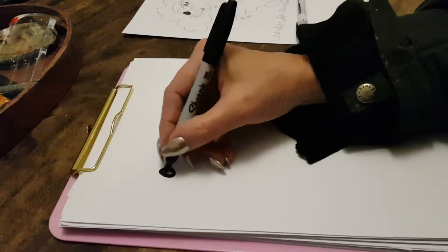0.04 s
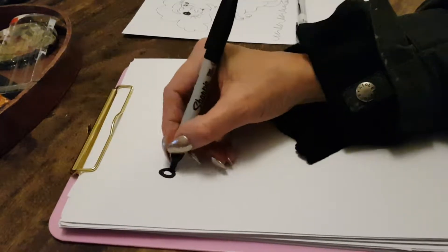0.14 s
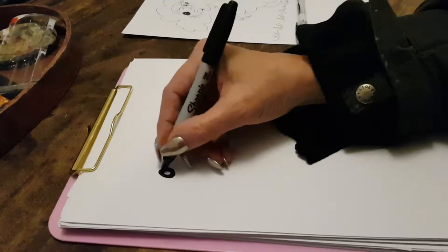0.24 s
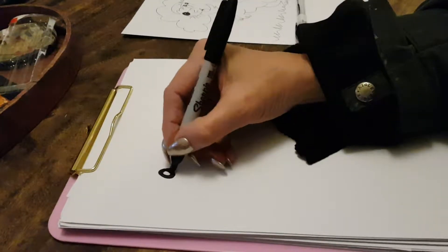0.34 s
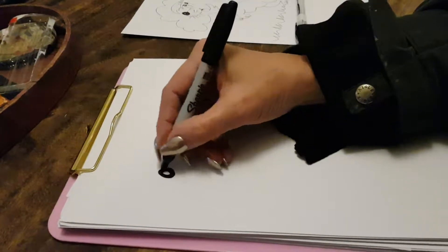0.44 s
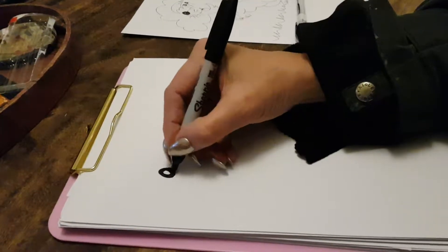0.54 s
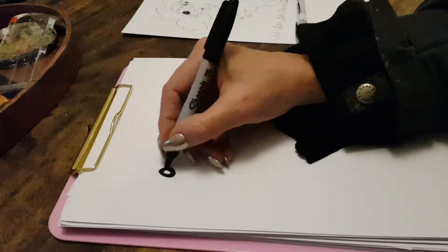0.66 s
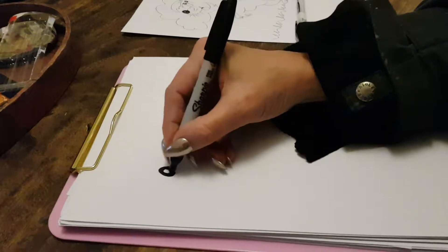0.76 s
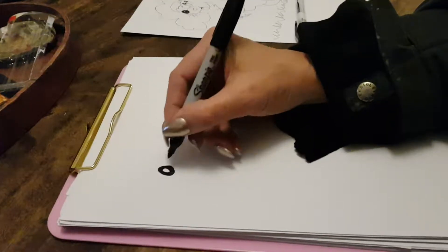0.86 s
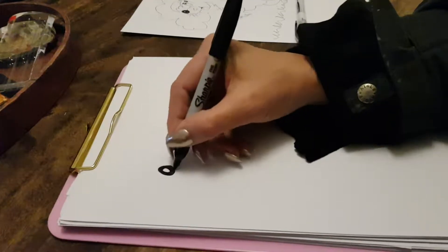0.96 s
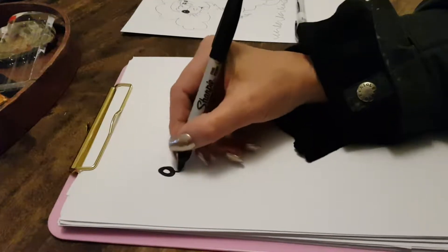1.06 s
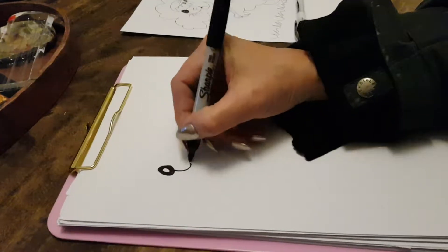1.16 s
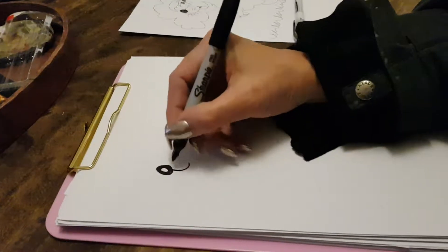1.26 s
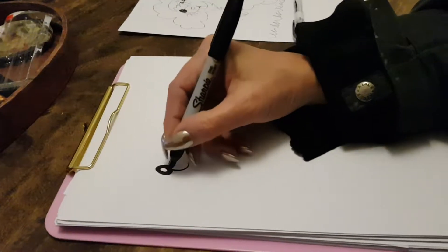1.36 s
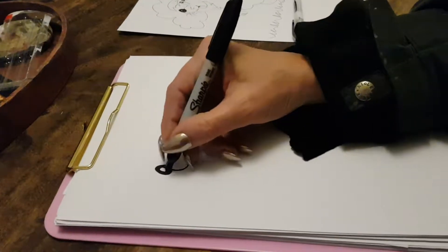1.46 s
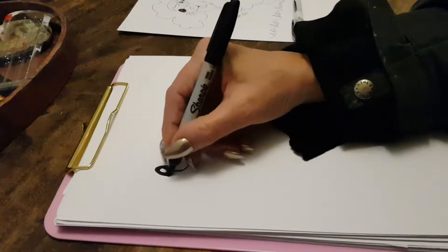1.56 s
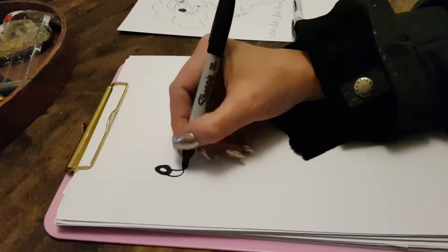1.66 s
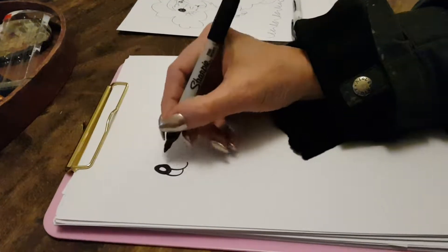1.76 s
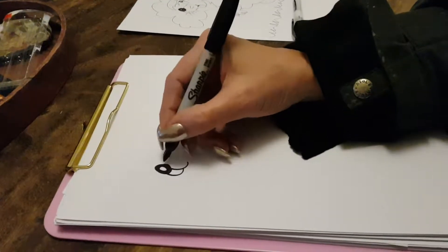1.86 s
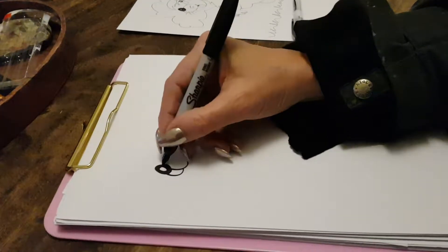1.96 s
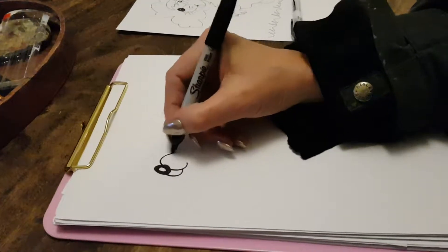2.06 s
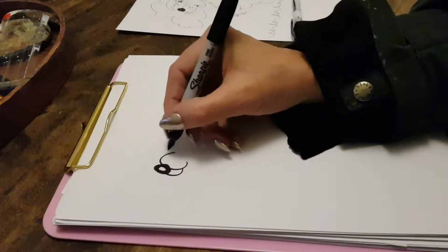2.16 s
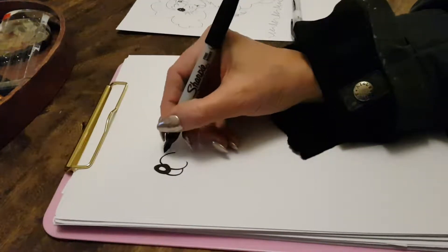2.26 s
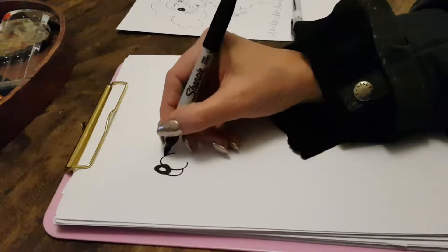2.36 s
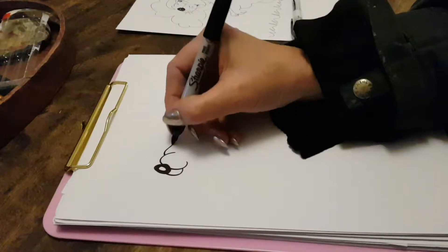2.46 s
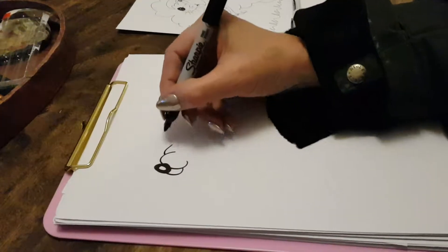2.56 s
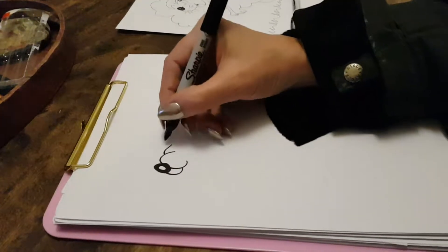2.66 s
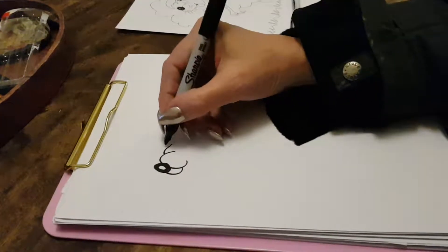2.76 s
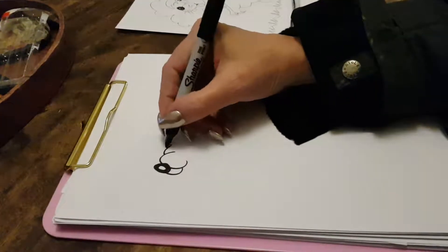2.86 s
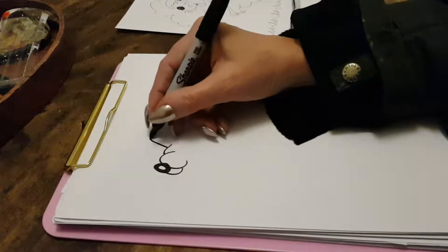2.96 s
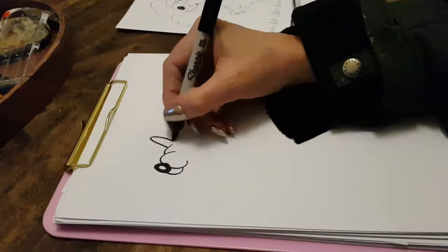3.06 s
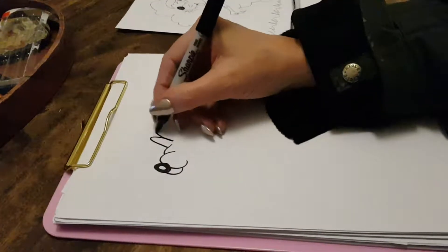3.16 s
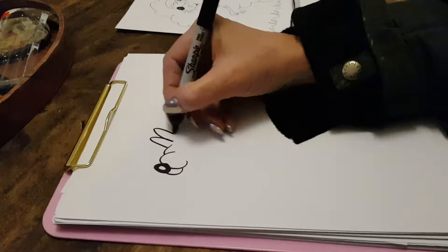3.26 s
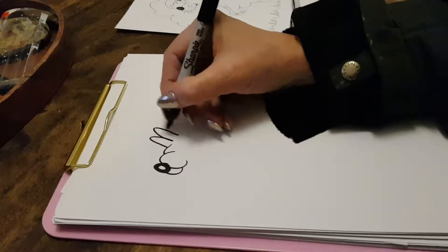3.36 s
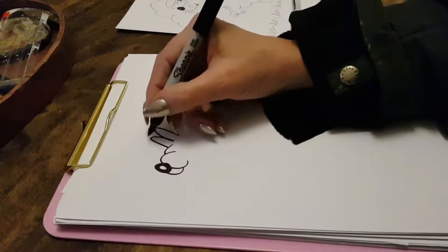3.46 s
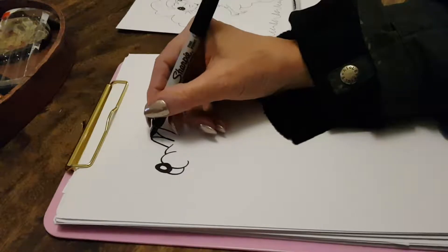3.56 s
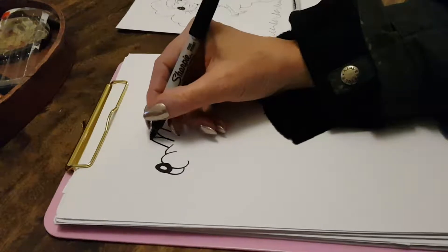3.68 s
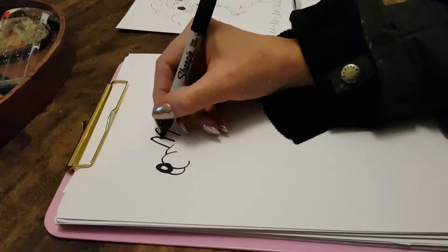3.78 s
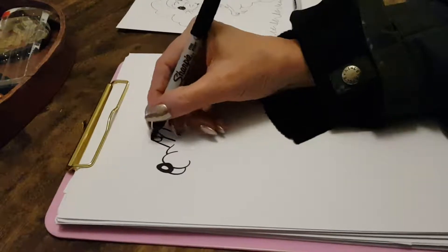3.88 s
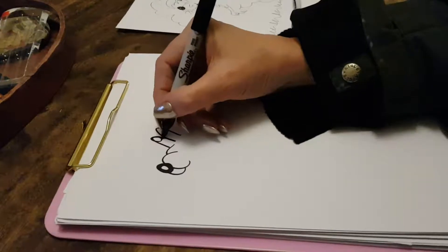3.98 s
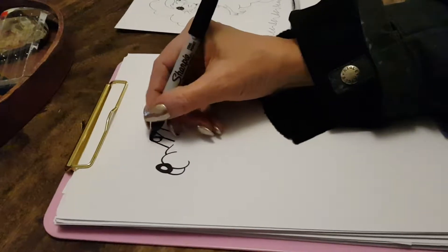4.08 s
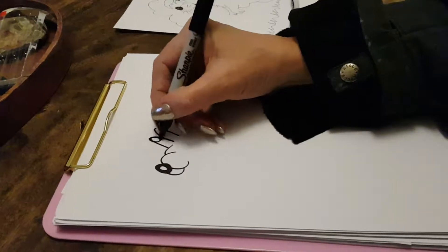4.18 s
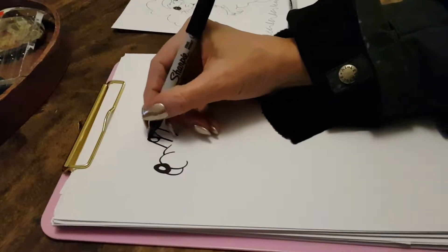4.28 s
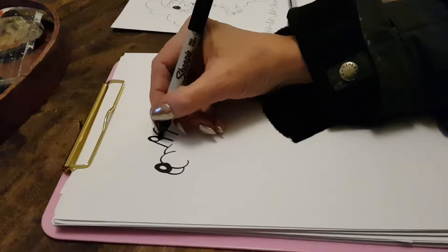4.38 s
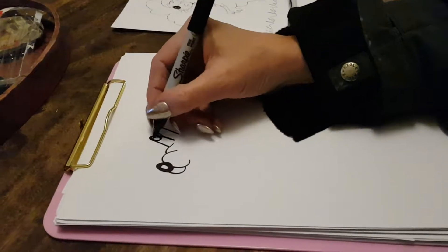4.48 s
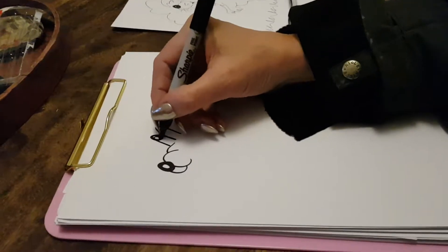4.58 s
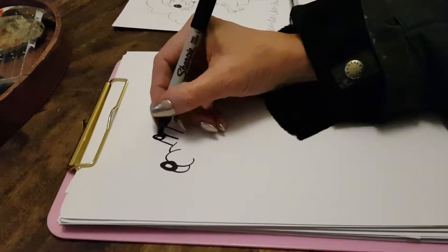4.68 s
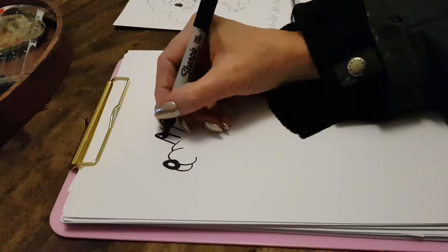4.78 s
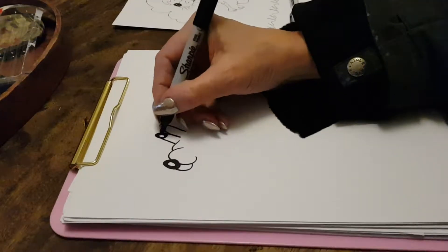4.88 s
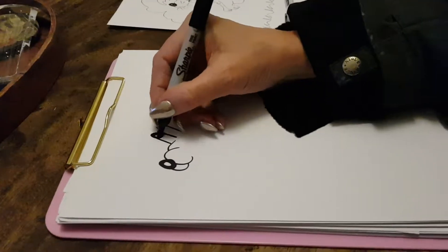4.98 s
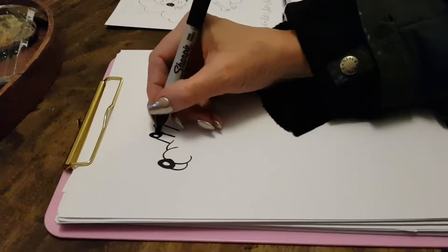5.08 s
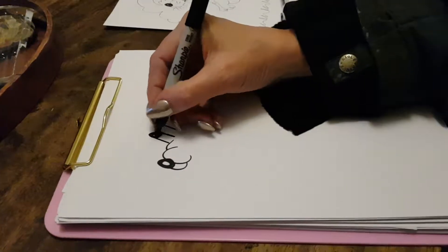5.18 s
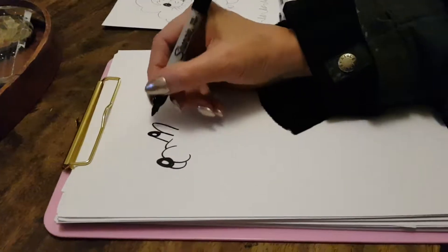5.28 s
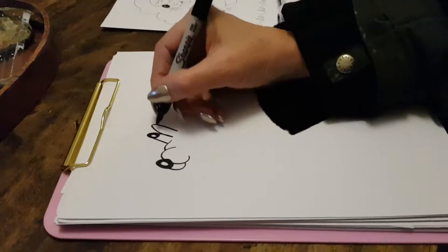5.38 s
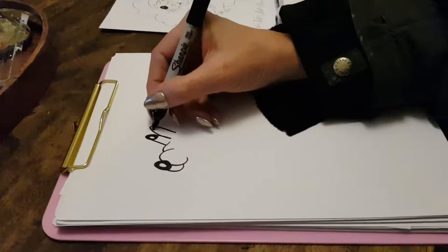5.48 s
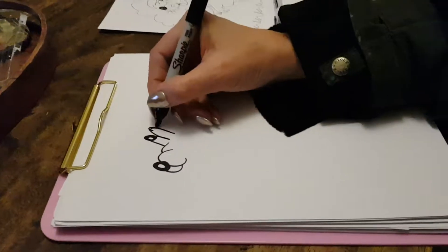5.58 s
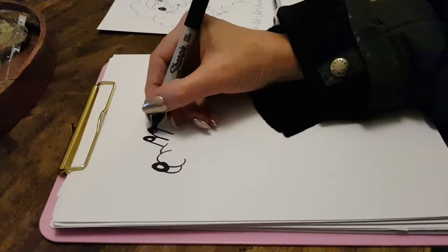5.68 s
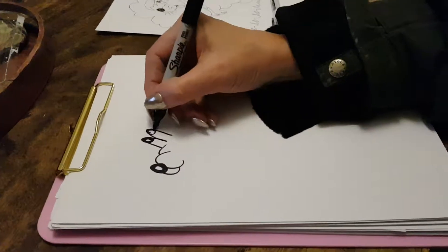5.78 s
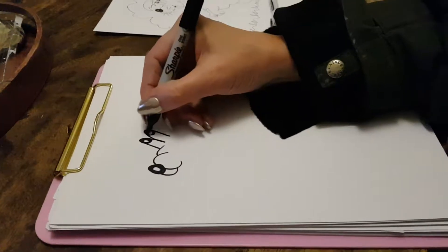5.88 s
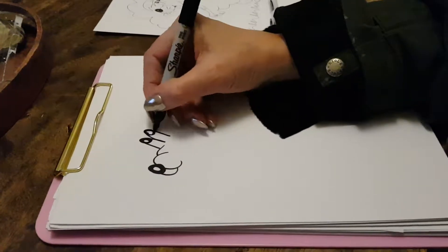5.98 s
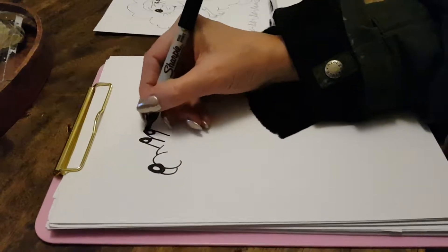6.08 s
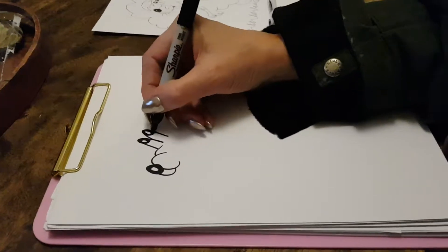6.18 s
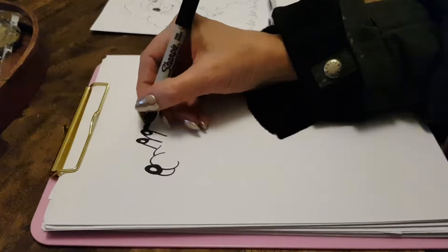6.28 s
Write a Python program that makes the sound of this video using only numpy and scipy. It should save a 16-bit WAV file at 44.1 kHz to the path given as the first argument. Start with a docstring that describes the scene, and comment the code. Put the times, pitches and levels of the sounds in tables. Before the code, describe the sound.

A felt-tip marker scribbles rapidly on paper over a clipboard, very close, with thin hiss and a slight squeaky rasp. After a short pause come isolated swishes and loops with gaps between them, then a longer run of fast back-and-forth filling-in, a tiny break and another burst. Soft hand slides, dull rubs and small ticks accompany it. Quiet small room, faint low rumble and hiss, close stereo microphone.

```python
"""Quick back-and-forth marker strokes hiss close by as they fill in a spot on paper on a clipboard in a quiet room.
A few single lines and loops follow, then more filling-in, with faint slides of the hand, dull rubs and ticks.
Friction is sparse random snaps of the nib on paper fibres, coloured as hiss, rasp, sheet buzz and board sound.
Judders and ticks are noise bursts through resonances; the room adds a short decaying tail.
A low rumble and a faint steady hiss of filtered noise lie underneath."""
import sys
import numpy as np
from scipy import signal
from scipy.fft import rfft, irfft, next_fast_len
from scipy.io import wavfile
from scipy.ndimage import uniform_filter1d, map_coordinates

SR = 44100
rng = np.random.default_rng(int(sys.argv[2]) if len(sys.argv) > 2 else 0)


def store_pcm(level_fs):
    """Save levels as 16-bit WAV."""
    pcm = np.round(np.clip(level_fs, -1, 1) * 32767).astype(np.int16)
    wavfile.write(sys.argv[1], SR, np.atleast_2d(pcm).T)


N = 279329  # length [samples]
CONTROL_STEP = 32  # samples between points of the slow level curves


def amp(db):
    """Decibel law: level in dB to amplitude gain."""
    return 10 ** (np.asarray(db) / 20)


def unit(x):
    """Normalisation: x scaled to rms 1."""
    return x / np.sqrt(np.mean(x ** 2) + 1e-20)


def along(points, hz):
    """Logarithmic frequency scale: (frequency [Hz], value) points interpolated at hz."""
    f, v = np.transpose(points)
    return np.interp(np.log(hz + 1), np.log(f + 1), v)


def control_times():
    """Slow sampling: the times [s] at which level curves are computed."""
    return np.arange(0, N, CONTROL_STEP) / SR


def per_sample(t, curve):
    """Linear interpolation: a slow curve read at every audio sample."""
    return np.interp(np.arange(N) / SR, t, curve)


def wobble(rate):
    """Random modulation: a smooth curve through rate random knots a second."""
    knots = rng.standard_normal(int(N * rate / SR) + 4)
    return map_coordinates(knots, [np.arange(N) * rate / SR])


def patches(shape, size):
    """Random field: frequency by time, rms 1, smoothed over size = (bins, frames)."""
    over_frequency = uniform_filter1d(rng.standard_normal(shape), size[0], 0)
    return unit(uniform_filter1d(over_frequency, size[1], 1))


def filtered(x, response):
    """Linear filtering: the spectrum of x times a response of frequency."""
    m = next_fast_len(N + SR // 4)
    return irfft(rfft(x, m) * response(np.fft.rfftfreq(m, 1 / SR)), m)[..., :N]


def steady(spectrum, side_db):
    """Mid-side stereo: coloured noise of rms 1, its side part side_db relative to the middle."""
    mid, side = filtered(rng.standard_normal((2, N)), lambda hz: amp(along(spectrum, hz)))
    side = amp(side_db) * side
    return unit(np.array([mid + side, mid - side]))


# spectrum of the room's low rumble: (frequency [Hz], level [dB])
RUMBLE = [(15, -31), (25, -18.5), (57, 0.5), (92, -2.5), (121, -0.5), (177, -6.5), (242, -17), (399, -21.5),
          (500, -16.5), (650, -26), (1100, -120)]


def rumble():
    """Stationary low-frequency noise: the room's rumble, its level drifting irregularly."""
    level_db = -69.5 + 1.2 * wobble(5.03)
    return amp(level_db) * steady(RUMBLE, side_db=-6.0)


# spectrum of the steady faint hiss: (frequency [Hz], level [dB])
AIR = [(150, -27), (300, -1.5), (520, -16.5), (700, -10.5), (1500, -13.5), (3000, -14.5), (6000, -15),
       (8000, -20), (10000, -17.5), (12500, -11.5), (16000, -13)]


def air():
    """Stationary broadband noise: a faint hiss of constant level."""
    return amp(-71.5) * steady(AIR, side_db=-1.0)


# decay time of the room: (frequency [Hz], time to fall 60 dB [s])
ROOM = [(200, 0.33), (1000, 0.35), (5000, 0.28), (14000, .27)]


def room(x):
    """Reverberation: convolution with exponentially decaying noise whose treble dies first."""
    hz, t, z = signal.stft(rng.standard_normal((2, SR // 2)), SR, nperseg=256)
    decay = amp(-60 * t / along(ROOM, hz)[:, None])
    tail = signal.istft(z * decay, SR, nperseg=256)[1]
    return signal.fftconvolve(x, tail / np.linalg.norm(tail[0]), axes=1)[:, :N]


# the two microphone ports:
# (frequency [Hz], left minus right [dB], likeness [0-1], left lead [rad])
PORTS = [(200, 0, .66, .1), (800, 6, .8, .8), (1400, 3.8, .5, .6), (2300, -1.3, .68, .85),
         (3400, -.8, .5, .3), (4900, -8.5, .68, 2.2), (5700, -6.5, .55, 3.1), (7700, -9.5, .45, 3.3),
         (9500, -3.2, .55, .9), (11000, -4.8, .65, -1.6), (12000, -3.7, .8, -3.5), (13300, 1.5, .6, -4.9),
         (14500, 5.2, .6, -4.5), (15500, 6.2, .65, -3.8)]


def at_ports(pair, colour_db, sway_s=1.1e-5):
    """Interchannel coherence: two unrelated noises, coloured, become partly alike left and right."""
    hz, t, z = signal.stft(pair, SR, nperseg=1024)
    f, side_db, alike, lead = np.transpose(PORTS)

    def read(column):
        return along(np.c_[f, column], hz)[:, None]

    delay = sway_s * patches((1, len(t)), size=(1, 7))  # the moving nib shifts the delay between the ports
    phase = read(lead) + 2 * np.pi * hz[:, None] * delay
    shared = read(alike) * np.exp(-1j * phase)
    own = np.sqrt(np.maximum(1 - abs(shared) ** 2, 0))
    right = shared * z[0] + own * z[1]
    left_share = 1 / (1 + amp(-2 * read(side_db)))  # of the power
    z = np.array([z[0] * np.sqrt(left_share), right * np.sqrt(1 - left_share)])
    return signal.istft(z * amp(colour_db(hz[:, None], t)), SR, nperseg=1024)[1][:, :N]


def friction(spectrum, catches, size_db, ripple_db, patchy_db, slow_hz, fast_hz, glide_db):
    """Stick-slip: fibres catch and let go, catches a second; a raised band glides with nib speed."""
    happens = rng.random((2, N)) < catches / SR
    clumps = amp(size_db * wobble(900))  # fibres lie in clumps
    snaps = happens * rng.standard_normal((2, N)) * clumps

    def colour_db(hz, t):
        strongest = slow_hz * (fast_hz / slow_hz) ** nib_speed(t)
        octaves_away = np.log2((hz + 1) / strongest)
        glide = glide_db * np.exp(-(octaves_away / 0.36) ** 2)
        ripple = ripple_db * patches(glide.shape, size=(2, 36))  # echoes off desk and hand drift slowly
        patchy = patchy_db * patches(glide.shape, size=(14, 5))
        return along(spectrum, hz) + glide + ripple + patchy

    return unit(at_ports(snaps, colour_db))


def swell(rows, lead, rise_width, fall_width, flatness):
    """Power summation: (top [s], rise [s], fall [s], level [dB]) humps, peaking lead s before top.

    The widths scale rise and fall; flatness sharpens the hump's flanks.
    """
    top, rise, fall, db = np.transpose(rows)[:, :, None]
    t = control_times()
    lead = np.reshape(lead, (-1, 1))
    since = t - (top - lead)
    width = np.where(since < 0, rise_width * rise, fall_width * fall + lead / 2)
    hump = np.exp(-np.abs(since / np.maximum(width, 1e-3)) ** flatness)
    power = amp(2 * db) * hump
    return np.sqrt(per_sample(t, power.sum(axis=0)))


# spectrum of the hand on paper: (frequency [Hz], level [dB])
SKIN = [(300, -14), (800, -9), (1800, -17.5), (4000, 2), (6000, 7), (8000, -5), (11000, 3), (15500, -5)]
# faint slides of the hand between lines: (time [s], nominal length [s], level [dB])
SLIDES = [(0.923, 0.08, -69.5), (1.335, 0.06, -68.5), (2.577, 0.094, -54.5), (2.866, 0.098, -72),
          (3.455, 0.09, -62.5), (3.749, 0.037, -53.5), (5.346, 0.036, -54.5)]


def slides(rise_share):
    """Sliding friction: the side of the hand brushes the sheet as smoothly swelling noise."""
    rows = [(s, rise_share * length, (1 - rise_share) * length, db) for s, length, db in SLIDES]
    level = swell(rows, 0, rise_width=0.96, fall_width=0.86, flatness=1.9)
    brush = at_ports(rng.standard_normal((2, N)), lambda hz, t: along(SKIN, hz))
    return level * unit(brush)


# spectrum of the dull rub: (frequency [Hz], level [dB])
PAD = [(60, -39), (130, 11.5), (250, -7.5), (420, 0.5), (650, 0), (1500, -5.5), (2200, -42), (4000, -46)]
# the nib presses down or the hand shifts its weight: (time [s], relative level [dB])
PUSHES = [(0.835, -56), (0.884, -64), (1.106, -52), (1.158, -58), (1.596, -66), (2.034, -51), (2.433, -48),
          (3.079, -55), (3.269, -59.5), (5.599, -53)]


def pushes(attack, t60, gain_db):
    """Pressure-driven friction: pressure builds softly and eases off while the pad rubs low."""
    s, db = np.transpose(PUSHES)[:, :, None]
    t = control_times()
    age = np.maximum(t - s, 0)
    build = (1 - np.exp(-age / attack)) ** 2
    pressure = np.sum(amp(db + gain_db - 60 * age / t60) * build, axis=0)
    rub = friction(PAD, catches=1500, size_db=2.2, ripple_db=2, patchy_db=1.2,
                   slow_hz=450, fast_hz=1400, glide_db=3)
    return per_sample(t, pressure) * rub


def bursts(rows, attack, t60, breadth, gain_db):
    """Damped resonance: decaying noise passed twice through a broad band at each row's pitch."""
    out, t = np.zeros((2, N + SR)), np.arange(SR // 4) / SR
    hz = np.fft.rfftfreq(len(t), 1 / SR)
    shape = (1 - np.exp(-t / attack)) * amp(-60 * t / t60)
    for s, db, pitch in rows:
        damping = 1j * hz * breadth * pitch
        ring = damping / (pitch ** 2 - hz ** 2 + damping)
        noise = shape * rng.standard_normal((2, len(t)))
        burst = irfft(rfft(noise) * ring ** 2, len(t))
        start = round(s * SR)
        out[:, start:start + len(t)] += amp(db + gain_db) * burst / np.abs(burst).max()
    return out[:, :N]


# the nib or the hand sticks and judders on the board:
# (time [s], relative level [dB], pitch [Hz])
JUDDERS = [(0.049, -51, 784), (0.415, -47.5, 620), (0.769, -44.5, 733), (0.838, -49, 463),
           (0.862, -67, 477), (0.894, -51, 412), (0.955, -56.5, 368), (1.205, -53, 660), (2.452, -50, 239),
           (3.848, -45.5, 760), (4.424, -42, 810), (4.781, -43, 810), (4.993, -40, 784),
           (5.185, -41.5, 800), (6.233, -43.5, 740)]


def judders():
    """Stick-slip resonance: short spells of slipping ring the board and reach both ports."""
    slips = bursts(JUDDERS, attack=0.0037, t60=.1, breadth=0.25, gain_db=-3.5)
    return at_ports(slips, lambda hz, t: 0)


# small sharp ticks of the nib and fingernails: (time [s], relative level [dB], pitch [Hz])
TICKS = [(0.5535, -31.5, 3900), (0.7043, -25, 11900), (0.9382, -41, 10800), (0.952, -41, 14900),
         (1.265, -42, 14030)]


def ticks():
    """Impact excitation: very short noise bursts ring a heavily damped resonance."""
    return bursts(TICKS, attack=0.00038, t60=0.0076, breadth=0.32, gain_db=4.5)


# quick back-and-forth strokes that fill in a spot: (time of top speed [s], strength [dB])
SCRIBBLES = [(0.0, -38.5), (0.083, -43.5), (0.179, -40), (0.269, -45.5), (0.366, -39.5), (0.463, -43),
             (0.555, -39.5), (0.657, -41.5), (0.747, -41.5), (0.803, -56), (3.822, -42.5), (3.915, -41.5),
             (4.016, -42), (4.116, -42.5), (4.208, -42.5), (4.308, -44), (4.397, -44), (4.49, -46.5),
             (4.588, -47.5), (4.68, -46.5), (4.774, -49), (4.875, -45.5), (4.96, -48), (5.064, -45.5),
             (5.157, -45), (5.249, -45.5), (5.541, -50.5), (5.605, -56.5), (5.668, -43.5), (5.749, -44),
             (5.85, -39), (5.942, -39.5), (6.033, -38.5), (6.119, -41), (6.213, -42), (6.296, -44.5)]
# strokes, landings and catches of the single lines and loops, each with its own rise and fall:
# (time of top speed [s], rise [s], fall [s], strength [dB], drag lead [s])
LINES = [(1.118, 0.016, 0.036, -38.5, -0.002), (1.186, 0.03, 0.039, -48, 0.022),
         (1.631, 0.034, 0.039, -37.5, -0.012), (1.695, 0.028, 0.029, -48, 0.0032),
         (2.036, 0.0025, 0.013, -30.5, -0.0024), (2.05, 0.06, 0.033, -37.5, -0.026),
         (2.097, 0.029, 0.042, -45, -0.011), (2.447, 0.027, 0.055, -46, -0.006),
         (2.958, 0.032, 0.042, -34.5, 0.003), (3.083, 0.029, 0.038, -35, 0.022),
         (3.157, 0.004, 0.01, -39, 0.0015), (3.206, 0.038, 0.03, -32.5, 0.0099),
         (3.304, 0.028, 0.034, -30.5, 0.021)]


def strokes():
    """Kinematics: scribbles of one shared shape, then lines, all as rows in the columns of LINES."""
    rise_s, fall_s, lead_s = 0.029, 0.028, 0.019  # speeding up, slowing down, drag ahead of speed
    return np.array([(s, rise_s, fall_s, db, lead_s) for s, db in SCRIBBLES] + LINES)


def nib_speed(t):
    """Reciprocating motion: relative speed, near 0 in the turns and 1 in the middle of a stroke."""
    top, rise, fall = strokes().T[:3, :, None]
    place = (t - top) / np.maximum(np.where(t < top, rise, fall), 1e-3)
    return np.exp(-(place / 0.91) ** 2).max(axis=0)


# spells of the nib on the paper; grip and place on the sheet colour each one:
# (touch-down [s], settling [s], lift [s], rasp [dB], sheet buzz [dB], board [dB],
#  hiss left minus right [dB])
CONTACTS = [(-0.1, 0.01, 0.825, -47, -54.5, -58.5, 0), (1.098, 0.0027, 1.212, -46, -56, -54.5, 2.5),
            (1.567, 0.017, 1.716, -45, -61, -55, 1), (2.001, 0.028, 2.122, -45, -55, -57.5, 2),
            (2.414, 0.0083, 2.495, -47, -54, -53.5, 2.5), (2.897, 0.013, 3.103, -47.5, -62.5, -62.5, 0.5),
            (3.146, 0.0018, 3.345, -48, -62, -58.5, 2), (3.712, 0.024, 5.255, -47.5, -58, -58, 2.5),
            (5.51, 0.01, 6.302, -47.5, -57, -55, 1.5)]
LIFT_S = 0.011  # time constant as the nib leaves the paper
BITE_DB, BITE_S = 9, 0.017  # extra rasp as the nib lands, and its time constant
SWING_DB, SWING_S = -8.5, 0.029  # a fresh line hisses toward the right, then swings back as it curves


def touch():
    """Contact mechanics: contact 0-1, gains of rasp, buzz and board, and the hiss's lean in dB."""
    down, settle, lift, rasp_db, buzz_db, board_db, side_db = np.transpose(CONTACTS)[:, :, None]
    t = control_times()
    age = np.maximum(t - down, 0)
    landing = (1 - np.exp(-age / settle)) ** 2
    on = landing * np.exp(-np.maximum(t - lift, 0) / LIFT_S)
    bite_db = BITE_DB * np.exp(-age / BITE_S)
    lean_db = side_db + SWING_DB * np.exp(-age / SWING_S)
    values = (1, amp(rasp_db + bite_db), amp(buzz_db), amp(board_db), lean_db)
    return [per_sample(t, (on * v).sum(axis=0)) for v in values]


# spectrum of the paper fibres: (frequency [Hz], level [dB])
HISS = [(5330, -33), (8200, -13), (9500, -9.5), (10800, -7), (12000, -2), (13100, -4.5), (14600, -5),
        (15600, -0.5), (18000, -34)]
# spectrum of the nib and barrel: (frequency [Hz], level [dB])
RASP = [(2080, -42), (3200, -13.5), (4200, -4.5), (5000, 1), (5600, -2), (6400, -4), (7200, -12.5),
        (8000, -11), (10500, -36)]
# spectrum of the top sheet: (frequency [Hz], level [dB])
SHEET = [(1500, -29.5), (1850, -12.5), (2100, -1), (2350, 0), (2700, -4), (3100, -12), (3800, -13.5)]
# spectrum of the paper stack and clipboard: (frequency [Hz], level [dB])
BOARD = [(260, -27), (400, -19), (600, -4.5), (780, 1.5), (1100, -4), (1400, -6.5), (1750, -13),
         (2400, -19), (3400, -18), (4500, -14)]
USUAL_DB = -44.5  # strength of an ordinary stroke
DRAG_GROWS, BOARD_GROWS = 0.48, 0.11  # dB of drag and of board sound for each dB of strength


def marker():
    """Friction-excited vibration: hiss follows speed, rasp and buzz the drag, board the contact."""
    on, rasp_gain, buzz_gain, board_gain, side_db = touch()
    top, rise, fall, db, lead = strokes().T
    runs = np.c_[top, rise, fall, db]
    pulls = np.c_[top, rise, fall, DRAG_GROWS * (db - USUAL_DB)]
    presses = np.c_[top, rise, fall, BOARD_GROWS * (db - USUAL_DB)]

    lean = amp(np.array([side_db, -side_db]) / 2)
    speed = on * lean * swell(runs, 0, rise_width=0.81, fall_width=0.74, flatness=1.84)
    drag = rasp_gain * swell(pulls, lead, rise_width=0.72, fall_width=0.78, flatness=1.5)
    flutter = buzz_gain * swell(pulls, lead / 2, rise_width=1.37, fall_width=1.05, flatness=2.95)
    # wide humps keep the board sounding through the turns
    contact = board_gain * swell(presses, 0, rise_width=1.9, fall_width=1.5, flatness=2.6)

    hiss = amp(0.96) * speed * friction(HISS, catches=20000, size_db=0.84, ripple_db=2.0, patchy_db=2.5,
                                        slow_hz=14100, fast_hz=10700, glide_db=1.0)
    rasp = drag * friction(RASP, catches=14000, size_db=0.5, ripple_db=1.75, patchy_db=1.5,
                           slow_hz=4700, fast_hz=7340, glide_db=3.5)
    buzz = flutter * friction(SHEET, catches=9000, size_db=1.2, ripple_db=1, patchy_db=1.8,
                              slow_hz=1900, fast_hz=3700, glide_db=3.5)
    board = contact * friction(BOARD, catches=8000, size_db=-0.2, ripple_db=2.5, patchy_db=3.0,
                               slow_hz=740, fast_hz=3270, glide_db=3.5)
    return hiss + rasp + buzz + board


def scene():
    """Superposition: background, the sounds at the desk, and the desk's reverberation."""
    background = rumble() + air()
    hand = slides(rise_share=0.4) + pushes(attack=0.022, t60=0.29, gain_db=0.0)
    desk = hand + judders() + ticks() + marker()
    return background + desk + amp(-9.5) * room(desk)


def record(dry):
    """Band limiting: only frequencies below 15950 Hz pass."""
    return filtered(dry, lambda hz: hz < 15950)


dry = scene()
out = record(dry)
store_pcm(out)
```